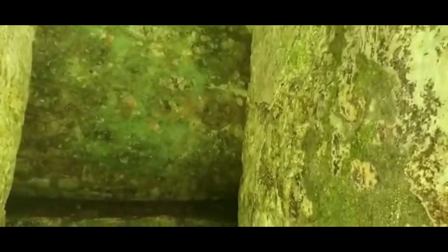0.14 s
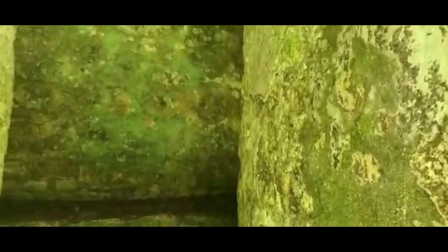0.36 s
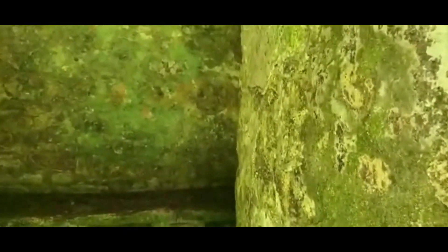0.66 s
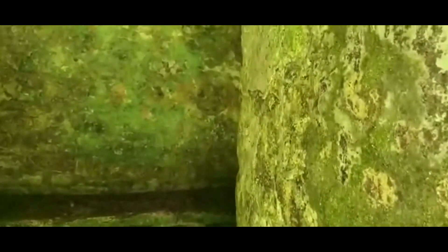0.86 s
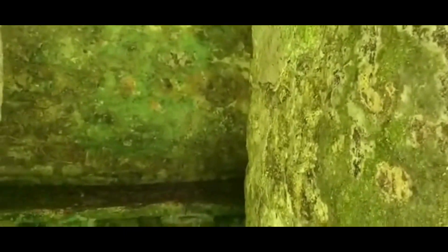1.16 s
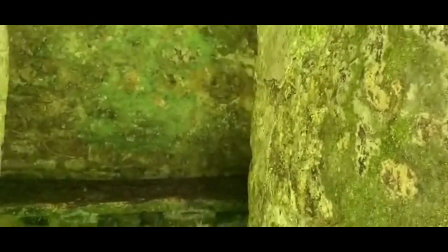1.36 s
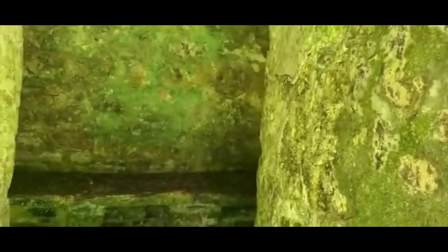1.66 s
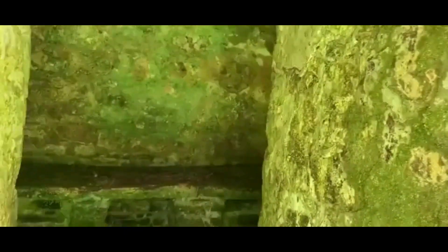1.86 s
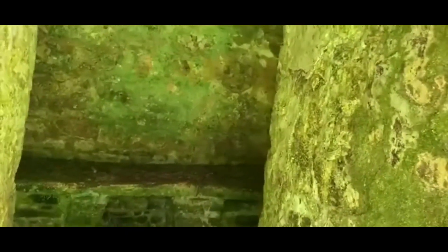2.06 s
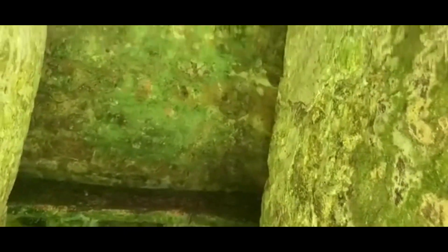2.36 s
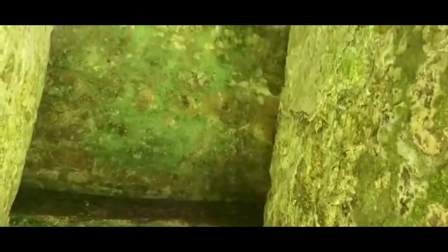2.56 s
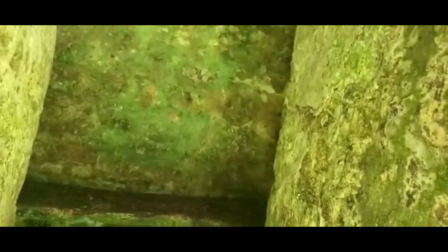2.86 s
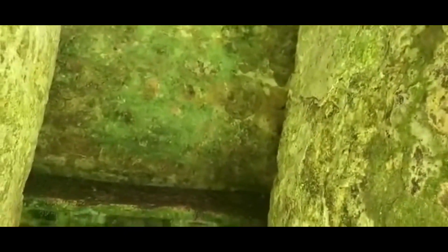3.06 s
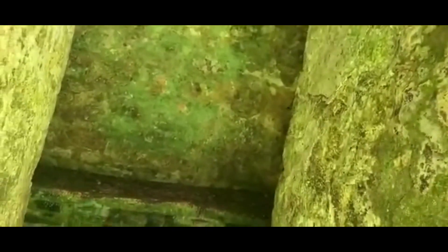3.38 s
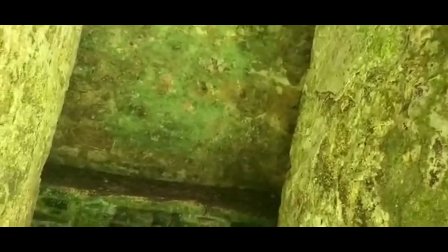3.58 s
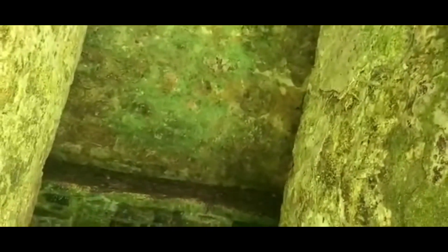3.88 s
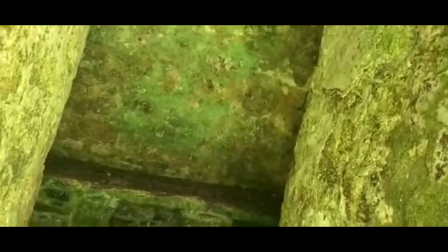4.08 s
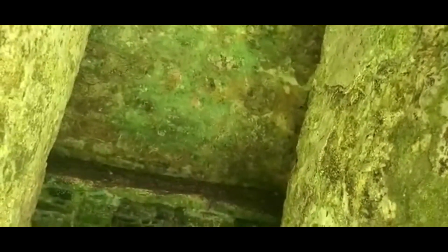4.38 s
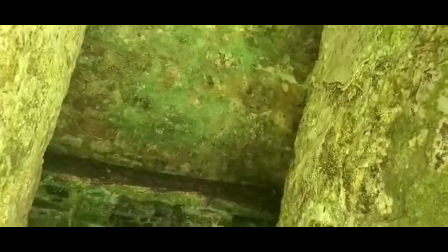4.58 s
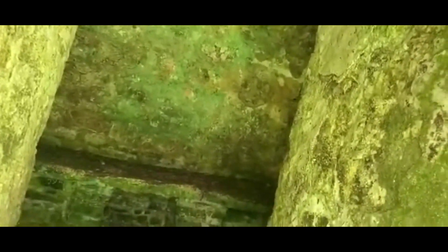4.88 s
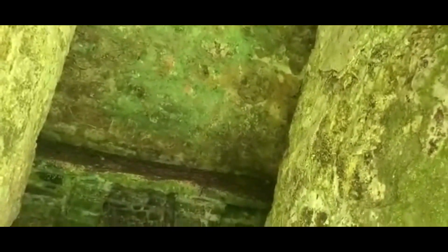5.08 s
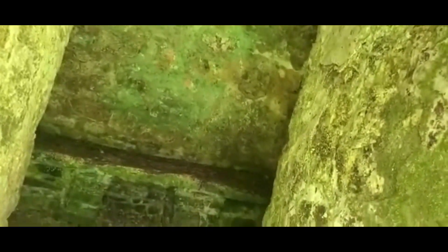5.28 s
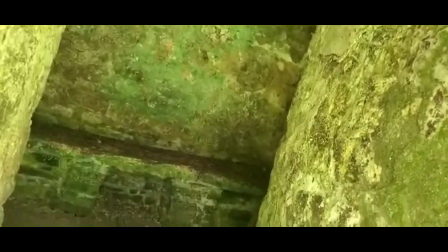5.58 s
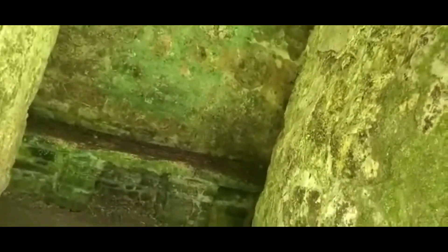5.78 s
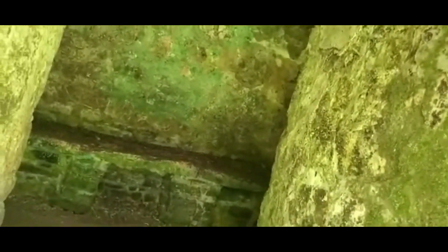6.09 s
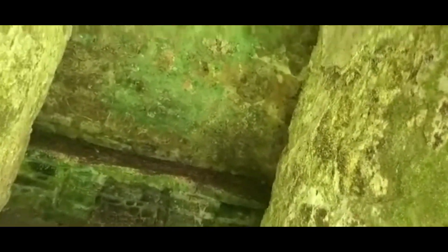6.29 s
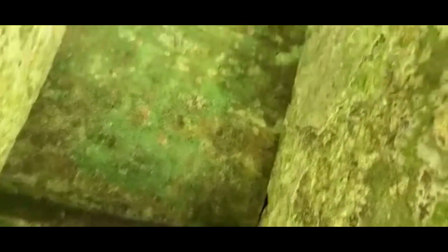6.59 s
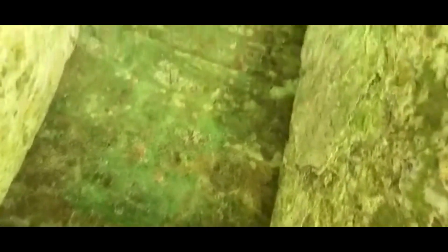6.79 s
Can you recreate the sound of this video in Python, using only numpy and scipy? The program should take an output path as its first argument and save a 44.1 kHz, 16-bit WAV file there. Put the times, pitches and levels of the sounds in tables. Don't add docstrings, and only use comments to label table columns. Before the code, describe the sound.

Handheld stereo microphone among mossy stones in a forest. Faint, bright insect throbbing and a thin steady hum continue throughout. An early handle thud and small metallic clink give way to light cloth rubbing, quick falling bird chirps, brief bright wing flicks and high arched whistles. Low shaking rumbles around five seconds, then abrupt close knocks, plastic ticks and sliding fingers dominate the final half second, heavier on the right.

```python
import sys
import numpy as np
from scipy import signal
from scipy.fft import rfft, irfft, next_fast_len
from scipy.io import wavfile
from scipy.ndimage import uniform_filter1d

SR = 44100
rng = np.random.default_rng(int(sys.argv[2]) if len(sys.argv) > 2 else 0)


def gain_from_decibels(decibels):
    exponent = np.asarray(decibels, float) / 20
    return 10 ** exponent


def store_wav(level_fs):
    pcm = np.round(np.clip(np.atleast_2d(level_fs), -1, 1) * 32767)
    wavfile.write(sys.argv[1], SR, pcm.T.astype(np.int16))


N = 306098
SIZE = next_fast_len(N + SR)
HZ = np.arange(SIZE // 2 + 1) * SR / SIZE + 1e-3
TIME = np.arange(N) / SR
CANOPY_T60_S = 1.8


def rms_one(x):
    return x / np.sqrt(np.mean(x ** 2) + 1e-20)


def in_time(rows):
    s, *columns = np.transpose(rows)
    return [np.interp(TIME, s, c) for c in columns]


def at_hz(points):
    hz, value = np.transpose(points)
    return np.interp(np.log(HZ), np.log(np.maximum(hz, 1)), value)


def sides(pan_db):
    return gain_from_decibels(np.array([pan_db / 2, -pan_db / 2]))


def drift(rate_hz):
    r = np.exp(-2 * np.pi * rate_hz * 40 / SR)
    slow = signal.lfilter([1], [1, -2 * r, r * r], rng.standard_normal(N // 40 + 2002))[2000:]
    return np.interp(np.arange(N) / 40, np.arange(len(slow)), rms_one(slow))


# pitch in Hz, likeness from 0 to 1.
LIKENESS = [(60, 0.17), (240, 0.94), (950, 0.28), (3770, 0.012), (15000, 0.11)]
# pitch in Hz, left over right in dB.
LEAN = [(60, 21), (110, 2), (200, -1.5), (380, -1), (700, -0.5), (1290, 10), (2380, -4), (4400, 2.5),
        (8120, -9), (15000, -3.5)]


def stereo_noise():
    mid, side = rfft(rng.standard_normal((2, SIZE)))
    alike = np.clip(at_hz(LIKENESS), 0, .99)
    both = np.sqrt(1 + alike) * mid + np.sqrt(1 - alike) * side * [[1], [-1]]
    return both * sides(at_hz(LEAN))


def coloured(spectrum, colour):
    inside = (HZ > colour[0][0]) & (HZ < colour[-1][0])
    x = irfft(spectrum * gain_from_decibels(at_hz(colour)) * inside, SIZE)[..., :N]
    middle = np.mean(np.atleast_2d(x), axis=0)
    return x / np.sqrt(np.mean(middle ** 2))


def canopy(x, wet_db, t60_s):
    t = np.arange(SR) / SR
    tail = rng.standard_normal((2, SR)) * gain_from_decibels(-60 * t / t60_s) * np.minimum(t / 0.02, 1)
    tail = tail / np.sqrt(np.sum(tail ** 2, axis=1, keepdims=True))
    return x + gain_from_decibels(wet_db) * irfft(rfft(x, SIZE) * rfft(tail, SIZE), SIZE)[:, :N]


def puffs(table, low_hz, high_hz):
    band = signal.butter(3, [low_hz, high_hz], "band", fs=SR, output="sos")
    noise = signal.sosfilt(band, rng.standard_normal((2, N)))
    shape = np.zeros((2, N))
    for s, db, long_s, pan_db in table:
        at = int(s * SR)
        fading = np.linspace(1, 0, int(1.6 * long_s * SR))[:N - at]
        shape[:, at:at + len(fading)] += np.outer(sides(pan_db), gain_from_decibels(db + 4.0) * fading)
    return noise * uniform_filter1d(shape, size=120, axis=1)


# pitch in Hz, level in dB per Hz.
CHORUS = [(3530, -111), (6000, -69), (6370, -15), (6930, -6), (7490, -8.5), (8080, -11.5), (9420, -12),
          (11100, -0.5), (11700, 2.5), (13900, -9), (15300, -10.5), (15800, -7), (16600, -7.5)]
# time in seconds, throbs counted so far.
PACE = [(0.075, 0), (0.715, 5), (1.197, 9), (2.245, 17), (3.38, 26), (4.48, 35), (5.505, 44), (6.08, 49),
        (6.94, 56)]
# time in seconds, level in dB.
SWELL = [(0.0, -57.5), (0.5, -61.5), (0.95, -62), (1.2, -63), (1.8, -62.5), (2.1, -60.5), (2.35, -63),
         (2.5, -60.5), (2.7, -63.5), (3.2, -64), (3.6, -61.5), (3.8, -63.5), (4.25, -63), (4.9, -63.5),
         (5.3, -63), (5.95, -64), (6.1, -63.5), (6.5, -61), (6.94, -62.5)]
TYMBAL_PER_S, THROB_S = 260, .165
TROUGH_DB, THROB_SPREAD_DB = -5.0, .5


def cicadas():
    gaps_s = (1 + .12 * rng.standard_normal(2000)) / TYMBAL_PER_S
    at = (np.cumsum(gaps_s) * SR).astype(int)
    clicks = np.zeros(N)
    clicks[at[at < N]] = gain_from_decibels(1.9 * rng.standard_normal(2000))[at < N]
    bursts = signal.lfilter([1], [1, -np.exp(-1 / (0.000083 * SR))], clicks)

    s, count = np.transpose(PACE)
    crests_s = np.interp(np.arange(count[-1] + 1), count, s)
    crest_db = np.interp(crests_s, *np.transpose(SWELL))
    crest_db = crest_db + THROB_SPREAD_DB * rng.standard_normal(len(crests_s))
    power = np.full(N, gain_from_decibels(2 * (np.median(crest_db) + TROUGH_DB)))
    trough = power.copy()
    for s, db in zip(crests_s, crest_db):
        span = slice(max(int((s - THROB_S) * SR), 0), min(int((s + THROB_S) * SR), N))
        x = (TIME[span] - s) / THROB_S
        x = np.where(x < 0, x * 1.4, x)
        power[span] += gain_from_decibels(2 * db) * np.cos(np.pi * np.clip(x, -.5, .5)) ** 2

    near = .2 * np.sqrt(power - trough) * rms_one(bursts)
    white = irfft(stereo_noise(), SIZE)[:, :N] * (np.sqrt(power) + near)
    return gain_from_decibels(-1.0) * np.sqrt(np.mean(power)) * coloured(rfft(white, SIZE), CHORUS)


# start in seconds, peak in dB, length in seconds, left over right in dB.
FLICKS = [
    (1.974, -52, 0.012, 5),
    (2.423, -52.5, 0.061, -4),
    (3.535, -49, 0.015, 0),
]


def wing_flicks():
    return puffs(FLICKS, 10900, 15300)


# time in seconds, level in dB.
HUM = [(0.0, -80), (0.1, -72), (0.5, -74), (1.1, -76.5), (1.5, -87), (1.7, -76.5), (2.1, -72.5), (3.1, -73),
       (3.6, -72), (5.0, -76), (5.5, -71.5), (6.3, -75.5), (6.55, -71.5), (6.94, -73)]
# pitch in Hz, width in Hz, level in dB.
HUM_MODES = [(2195, 39, -7.5), (2296, 180, -16), (2000, 77, -14.5)]
# time in seconds, pitch in Hz, level against the blur in dB.
SOLOIST = [(0, 2216, -4), (3.4, 2204, -8.5), (4.6, 2201, 1), (6.94, 2194, 0.5)]
HUM_WANDER_HZ, HUM_BEAD_DB, HUM_BLUR_DB = 3, 3.5, -2.0


def cricket():
    shape = 0
    for hz, width_hz, db in HUM_MODES:
        shape = shape + gain_from_decibels(db) / (1 + ((HZ - hz) / (width_hz / 2)) ** 2) / np.sqrt(width_hz)
    blur = irfft(stereo_noise() * shape, SIZE)[:, :N]
    blur = gain_from_decibels(HUM_BLUR_DB) * blur / np.std(blur.mean(axis=0))
    solo_hz, solo_db = in_time(SOLOIST)
    turns = np.cumsum(solo_hz + HUM_WANDER_HZ * drift(3.83)) / SR
    line = []
    for _ in range(2):
        beads = gain_from_decibels(HUM_BEAD_DB * drift(30))
        line.append(rms_one(beads * np.sin(2 * np.pi * turns + 0.62 * drift(1.3))))
    return gain_from_decibels(in_time(HUM)[0]) * (gain_from_decibels(solo_db) * sides(-7.0)[:, None] * line + blur)


# start in seconds, first, middle and last pitch in Hz, level in dB.
WHISTLES = [
    (2.65, 6470, 6740, 6530, -66),
    (4.538, 6707, 7044, 6866, -60.5),
    (5.586, 7100, 7460, 7100, -65),
    (6.44, 7230, 7570, 7040, -65),
]
WHISTLE_WARBLE_HZ = [45, 80, 210, 230]
WHISTLE_PACE = [.85, 0.94, 0.99, .92]
WHISTLE_S, ATTACK_S, RELEASE_S = .38, 0.041, 0.046
SAG_DB, LAST_PUSH_DB, WHISTLE_EDGE_DB = -4, 2.5, -22


def whistles():
    out = np.zeros(N)
    effort_s = [0, ATTACK_S, WHISTLE_S / 2, WHISTLE_S - RELEASE_S, WHISTLE_S]
    effort_levels_db = [WHISTLE_EDGE_DB, 0, SAG_DB, LAST_PUSH_DB, WHISTLE_EDGE_DB]
    for call, warble_hz, pace in zip(WHISTLES, WHISTLE_WARBLE_HZ, WHISTLE_PACE):
        s, first_hz, middle_hz, last_hz, db = call
        since = (TIME - s) / pace
        x = np.clip(since / WHISTLE_S, 0, 1)
        arch_hz = (middle_hz - (first_hz + last_hz) / 2) * np.sin(np.pi * x) ** 1.5
        hz = first_hz + (last_hz - first_hz) * x + arch_hz
        effort_db = np.interp(since, effort_s, effort_levels_db)
        gate = np.interp(since, [0, 0.0092, WHISTLE_S - .02, WHISTLE_S], [0, 1, 1, 0])
        tone = np.sin(2 * np.pi * np.cumsum(hz + warble_hz * drift(201.5)) / SR)
        out += gate * gain_from_decibels(db + effort_db + 2.5 * drift(43)) * tone
    return canopy(np.outer(sides(-5.0), out), wet_db=1.5, t60_s=.4 * CANOPY_T60_S)


# start in seconds, level in dB, first and last pitch in Hz, length in seconds.
CHIRPS = [(0.58, -73, 3460, 3420, 0.32), (1.262, -62.5, 4500, 4200, 0.088), (1.33, -66, 4200, 3830, 0.066),
          (1.39, -68, 3780, 3400, 0.073), (2.072, -59.5, 5270, 4710, 0.033),
          (2.112, -61.5, 5970, 4700, 0.05), (2.14, -59, 4200, 3530, 0.066), (2.155, -63, 3900, 3250, 0.084),
          (2.196, -63.5, 4400, 3265, 0.14), (2.26, -67, 4520, 3940, 0.16), (3.368, -69, 2410, 3280, 0.023),
          (3.57, -64.5, 4910, 4470, 0.064), (3.63, -66.5, 4570, 4130, .1), (3.952, -66, 2470, 2300, 0.073),
          (.62, -70.5, 1286, 1110, 0.18), (5.89, -73, 5250, 4800, .05), (5.885, -63.5, 4650, 4270, 0.083),
          (5.93, -70, 4580, 4230, 0.13), (5.95, -72, 4100, 3550, 0.11)]
# start in seconds, level in dB, first and last pitch in Hz, length in seconds.
COOS = [(5.84, -70.5, 680.5, 665, 0.084), (2.100, -68, 1800, 1760, 0.043), (2.243, -55, 4750, 5100, 0.03),
        (2.448, -88, 7100, 7100, 0.07), (5.237, -66.5, 2360, 2290, 0.064), (5.35, -75, 2350, 2295, .08),
        (5.59, -71, 1740, 1687, 0.092), (5.7, -73.5, 1690, 1670, 0.15), (5.92, -76.5, 1680, 1670, 0.081),
        (4.125, -66.5, 1960, 1840, .11), (4.25, -76, 1820, 1754, 0.12), (6.53, -67.5, 1845, 1850, 0.065),
        (6.64, -70, 1845, 1855, 0.12), (1.302, -70, 696, 700, 0.05), (1.643, -81, 704, 680, 0.12),
        (4.47, -77.5, 675, 670, 0.051)]
# start in
# seconds, level in dB, first and last pitch in Hz, length in seconds.
PIPES = [(2.27, -72, 5085, 5080, 0.14), (0.3, -85.5, 378.3, 372, 2.07), (3.5, -74, 4160, 4140, 0.3),
         (3.9, -78.5, 4150, 4150, 0.13), (4.05, -78.5, 4150, 4145, 0.23), (4.42, -89, 4130, 4150, 0.38),
         (4.6, -80, 1580, 1575, 0.2), (5.05, -80, 4105, 4095, 0.13), (5.36, -79.5, 4060, 4060, 0.14),
         (5.17, -65, 1900, 2085, 0.1), (3.7, -78, 2050, 2050, .4), (6.1, -84, 1600, 2600, .45),
         (3.55, -77, 2300, 2060, .3), (5.85, -80, 1965, 1960, .25), (5.82, -75.5, 4120, 4065, 0.45),
         (6.36, -77, 4100, 4600, 0.18), (6.76, -82, 4050, 4070, .1)]
CHIRP_WARBLE, COO_WARBLE, PIPE_WARBLE = .034, .012, .002


def birds():
    out, warble = np.zeros(N), drift(320)
    for notes, share in (CHIRPS, CHIRP_WARBLE), (COOS, COO_WARBLE), (PIPES, PIPE_WARBLE):
        for s, db, first_hz, last_hz, long_s in notes:
            x = np.arange(int(long_s * SR)) / (long_s * SR)
            span = slice(int(s * SR), int(s * SR) + len(x))
            hz = (first_hz + (last_hz - first_hz) * x) * (1 + share * warble[span])
            tone = np.sin(2 * np.pi * np.cumsum(hz) / SR)
            out[span] += gain_from_decibels(db) * np.sqrt(np.sin(np.pi * x)) * tone
    return gain_from_decibels(-6.0) * canopy(np.outer(sides(-6.0), out), wet_db=6.5, t60_s=0.57 * CANOPY_T60_S)


# start in seconds, swing in the right port in dB, first and last pitch in Hz, fade in seconds.
KNOCKS = [(0.036, -35.5, 60.3, 47, 0.044), (0.135, -20, 117, 52, 0.021), (.296, -37.5, 63, 49, 0.033),
          (.59, -49.5, 69, 55, 0.022), (1.77, -53, 70, 55, 0.035), (0.875, -42, 102, 75.4, 0.016),
          (2.666, -47.5, 102, 70, 0.024), (3.502, -51.5, 77.6, 50.3, 0.022), (4.842, -48, 97, 70, 0.016),
          (6.3905, -14, 114, 39, 0.028), (6.4405, -28, 70, 60, 0.0067), (6.457, -29, 92, 67, 0.029),
          (6.77, -30.5, 85.5, 74.6, 0.018), (6.7917, -14, 116, 54.5, 0.021), (6.838, -36.5, 55, 48, 0.017),
          (6.8702, -23, 105, 76.5, 0.022)]
SETTLE_S = 0.023
KNOCK_LEFT_DB, KNOCK_LEFT_LINGERS = -24, 1.24


def swing(t, fade_s):
    return (t / fade_s * np.exp(1 - t / fade_s)) ** 1.23 * np.exp(-(t / (1.34 * fade_s)) ** 2)


def knocks():
    out, t = np.zeros((2, N + SR)), np.arange(SR // 5) / SR
    for s, db, first_hz, last_hz, fade_s in KNOCKS:
        turns = last_hz * t + (first_hz - last_hz) * SETTLE_S * (1 - np.exp(-t / SETTLE_S))
        left, right = swing(t, KNOCK_LEFT_LINGERS * fade_s), swing(t, fade_s)
        at = int(s * SR)
        out[1, at:at + len(t)] += gain_from_decibels(db) * right * np.sin(2 * np.pi * turns)
        out[0, at:at + len(t)] += gain_from_decibels(db + KNOCK_LEFT_DB) * left * np.sin(2 * np.pi * turns - 1.2)
    leak = signal.butter(2, 28, "high", fs=SR, output="sos")
    return signal.sosfilt(leak, out[:, :N])


# start in seconds, peak in dB, pitch in Hz, left over right in dB.
TICKS = [(.017, -43, 3700, 4), (.087, -51.5, 630, -1), (.0873, -56, 1000, -1), (.088, -50, 234, -11),
         (0.141, -46, 215, -9), (.788, -47.5, 4480, -20), (1.355, -63, 593, 16), (3.074, -54, 805, -3),
         (3.074, -67, 332, 7), (3.241, -66.5, 228, -1), (3.276, -58, 534, -5), (3.601, -62.5, 610, -16),
         (6.3866, -46, 800, -14), (6.3944, -28.5, 1880, -18), (6.3942, -33.5, 1150, -12),
         (6.3948, -32, 280, -13), (6.3948, -40.5, 780, 14), (6.4, -35, 143, -9), (6.4073, -36, 890, 5),
         (6.4021, -50, 300, 16), (6.4069, -43, 1900, 12), (6.4305, -55, 1200, -15), (6.407, -41, 2140, -23),
         (6.4083, -40.5, 334, -15), (6.535, -57, 2000, -22), (6.7944, -35, 1650, -21),
         (6.7947, -34.5, 1010, -19), (6.7943, -43.5, 605, 21), (6.7944, -27.5, 252, -18.5),
         (6.8733, -40.5, 230, -16)]


def ticks():
    out, t = np.zeros((2, N)), np.arange(SR // 30) / SR
    for s, db, hz, pan_db in TICKS:
        cycles, at = t * hz, int(s * SR)
        if hz < 400:
            shape = -1.5 * np.exp(-((cycles - .75) / 0.65) ** 2)
        else:
            shape = 1.8 * np.minimum(cycles / 0.49, 1) * np.exp(-cycles / 1.21)
        ring = gain_from_decibels(db) * shape * np.sin(2 * np.pi * cycles)
        out[:, at:at + len(t)] += np.outer(sides(pan_db), ring)
    out[0] = np.roll(out[0], round(0.00026 * SR))
    soft = signal.butter(4, 3800, fs=SR, output="sos")
    return signal.sosfilt(soft, out)


# centre in seconds, peak in dB, width in seconds, left over right in dB, outward 1 or inward -1.
SHOVES = [(.138, -40, 0.0021, -20, -1), (6.4105, -42, 0.0012, 22, -1), (6.8062, -41, 0.0013, 20, 1),
          (6.8105, -48, .002, 20, -1), (6.389, -52, 0.00067, 16, -1), (6.391, -48, .0007, 16, -1),
          (6.3947, -31, 0.0021, -20, 1), (6.3995, -37, 0.00048, 18, -1), (6.8, -34, 0.0022, -22, 1),
          (6.799, -36, 0.00061, 20, -1), (6.878, -53, 0.00098, 18, -1), (6.4135, -50, .0008, 20, -1),
          (6.4165, -56, 0.00054, 20, -1), (6.798, -37, 0.0011, -20, 1), (6.398, -34, .001, -20, 1),
          (6.889, -32, 0.0021, -16, -1)]


def shoves():
    out, t = np.zeros((2, N)), np.arange(-600, 600) / SR
    for s, db, width_s, pan_db, way in SHOVES:
        at = int(s * SR) - 600
        bump = np.sign(way) * gain_from_decibels(db) * np.exp(-(t / width_s) ** 2)
        out[:, at:at + len(t)] += np.outer(sides(pan_db), bump)
    leak = signal.butter(1, 45, "high", fs=SR, output="sos")
    return signal.sosfilt(leak, out)


# start in seconds, peak in dB, length in seconds, left over right in dB.
SCUFFS = [
    (6.34, -61, 0.014, 1),
    (6.398, -41, 0.015, -9),
    (6.428, -53, 0.0068, -8),
    (6.44, -48, 0.017, -7),
    (6.46, -62.5, 0.19, 3),
    (6.8, -55, 0.068, 0),
    (6.868, -58.5, 0.095, -5),
]


def scuffs():
    return puffs(SCUFFS, 400, 1900)


# start in seconds, peak in dB, length in seconds, left over right in dB.
SPLASHES = [(3.22, -66, 0.07, -7), (3.37, -67, .03, -4), (3.53, -72, .006, 0), (6.386, -52, 0.0082, -6),
            (6.397, -61, 0.023, 0), (6.42, -61, 0.077, 0), (6.44, -69, 0.011, -1), (6.533, -67, .004, -1),
            (6.78, -63, .03, -2), (6.81, -65.5, .05, 5), (6.872, -64.5, .04, -3)]


def splashes():
    return puffs(SPLASHES, 2400, 5000)


# start in seconds, peak in dB, length in seconds, left over right in dB.
SNAPS = [
    (6.3948, -50, .001, 2.3),
    (6.407, -52, .001, 10),
]


def snaps():
    return puffs(SNAPS, 2500, 9000)


# start in seconds, level in dB.
CLINKS = [
    (0.5376, -52),
    (.5398, -47.5),
]
# pitch in Hz, level in dB, t60 in seconds.
BUCKLE = [(1377, -7, 0.022), (1800, -2.5, .008), (2300, -3, 0.0073), (3250, -2.5, 0.011)]


def clinks():
    out, t = np.zeros(N), np.arange(SR // 20) / SR
    ring = sum(-gain_from_decibels(db - 60 * t / t60_s) * np.sin(2 * np.pi * hz * t) for hz, db, t60_s in BUCKLE)
    for s, db in CLINKS:
        at = int(s * SR)
        out[at:at + len(t)] += gain_from_decibels(db) * ring * np.minimum(t / 0.00015, 1)
    band = signal.butter(4, [1050, 3900], "band", fs=SR, output="sos")
    return np.outer(sides(-8.0), signal.sosfilt(band, out))


STROKE_EDGE_DB = -16.5


def strokes(table, rest_db):
    t = TIME[::64]
    power = gain_from_decibels(2 * rest_db)
    for s, db, swell_s, fade_s in table:
        away = np.maximum((s - t) / swell_s, (t - s) / fade_s)
        power = power + gain_from_decibels(2 * (db + STROKE_EDGE_DB * away))
    return np.interp(TIME, t, np.sqrt(power))


# crest in seconds, level in dB, swell in seconds, fade in seconds.
RUBS = [(0.09, -68.5, 0.014, 0.07), (0.7, -71.5, 0.49, 0.66), (1.37, -70, 0.045, .2),
        (1.72, -76.5, 0.3, 0.12), (2.07, -74.5, 0.16, 0.56), (2.37, -74.5, 0.07, 0.35),
        (2.8, -77.5, .4, 0.55), (3.09, -69.5, 0.15, 0.15), (3.29, -69.5, 0.12, 0.24),
        (3.61, -71, 0.099, 0.23), (4.0, -75.5, 0.37, 0.68), (4.46, -75.5, 0.084, 0.17),
        (4.95, -81, 0.16, 0.44), (5.7, -80, 1, 0.078), (5.91, -72.5, 0.19, 0.079)]
# crest in seconds, level in dB, swell in seconds, fade in seconds.
HISSES = [(0.07, -86, 0.35, 0.47), (0.67, -82, 0.07, 0.37), (0.93, -78.5, 0.73, 0.16),
          (1.45, -89, 0.12, 0.13), (2.0, -83.5, 0.095, 0.18), (2.35, -76.5, 0.21, 0.28),
          (2.62, -86, 0.3, 0.4), (2.9, -87, 0.22, 0.32), (3.24, -81, 0.18, 0.16),
          (3.39, -81.5, 0.079, 0.053), (3.68, -83.5, 0.41, 0.65)]
# pitch in Hz, level in dB per Hz.
RUB = [(150, -1.5), (260, -1.5), (500, 3), (1000, 1.5), (1800, -12.5), (2800, 0)]
# pitch in Hz, level in dB per Hz.
HISS = [(700, -8), (1150, 2.5), (1600, 6), (2500, 4), (3500, 6), (4400, 2), (5600, -6), (7000, 3.5),
        (9000, -12)]


def rustle():
    dull = strokes(RUBS, rest_db=-89) * coloured(stereo_noise(), RUB)
    dry = gain_from_decibels(12.0) * strokes(HISSES, rest_db=-96.5) * coloured(stereo_noise(), HISS)
    return gain_from_decibels(2.0 * drift(100)) * dull + gain_from_decibels(1.46 * drift(79)) * dry


# time in seconds, level in dB, left over right in dB.
RUMBLE = [(0.0, -73.5, -30), (0.21, -63.5, -7), (0.36, -71.5, -19), (0.6, -75.5, -8), (0.9, -79.5, -22),
          (1.3, -77.5, 4), (1.85, -78, -11), (2.1, -74, -7.5), (2.5, -77, -10), (2.7, -76.5, -10),
          (3.2, -83.5, -4), (3.48, -74, -6), (4.6, -81.5, -9.5), (4.97, -65, -4), (5.55, -63.5, 2.5),
          (5.8, -80.5, -16.5), (6.25, -81, -13), (6.53, -66.5, -16)]
# pitch in Hz, level in dB per Hz.
RUMBLE_COLOUR = [(13, 3.5), (22, -47), (48, 2.5), (80, -1), (96, -0.5), (119, -12.5), (284, -20.5),
                 (350, -52), (460, -47), (770, -120)]


def rumble():
    level_db, pan_db = in_time(RUMBLE)
    lumps_db = 3.2 * drift(14)
    shared, own = (coloured(rfft(rng.standard_normal(SIZE)), RUMBLE_COLOUR) for _ in range(2))
    ports = np.array([0.46 * shared + 0.66 * own, shared])
    return gain_from_decibels(level_db + 1.0 + lumps_db) * sides(pan_db) * ports


# pitch in Hz, level in dB per Hz.
AIR = [(530, -68), (900, -17), (1140, -11.5), (1480, -12.5), (1530, -16), (1730, -7.5), (1950, -13.5),
       (2170, -1), (2490, -14), (2770, -21), (3510, -13.5), (4260, -14.5), (4620, -18.5), (4800, -26.5),
       (5400, -27.5), (6000, -29), (6250, -13.5), (7000, -13.5), (7800, -17.5), (8600, -41), (13900, -120)]
# pitch in Hz, level in dB per Hz.
HOLLOW = [(82, -22), (140, 0.5), (302, -7.5), (372, -4), (437, -11.5), (517, -7.5), (592, -9.5), (950, -24),
          (1240, -32), (2090, -120)]
AIR_DB, HOLLOW_DB = -74, -83.5


def air():
    forest = gain_from_decibels(AIR_DB) * coloured(stereo_noise(), AIR)
    hollow = gain_from_decibels(HOLLOW_DB) * coloured(stereo_noise(), HOLLOW)
    whole = rfft(forest + hollow, SIZE)
    octave = np.log2(HZ / 75)
    out = np.zeros((2, N))
    for k in range(8):
        part = irfft(whole * np.clip(1 - abs(octave - k), 0, 1), SIZE)[:, :N]
        out += part * gain_from_decibels(1.85 * drift(7.9))
    return out


def patchy(x, depth_db):
    cells = signal.stft(x, nperseg=1024)[2]
    field = uniform_filter1d(rng.standard_normal(cells.shape), size=3, axis=1)
    field = uniform_filter1d(field, size=5, axis=2)
    return signal.istft(cells * gain_from_decibels(depth_db * rms_one(field)), nperseg=1024)[1][:, :N]


def scene():
    far = patchy(cicadas() + air(), depth_db=2.0)
    forest = far + wing_flicks() + cricket() + whistles() + birds()
    handle = knocks() + ticks() + shoves() + clinks() + rustle() + rumble()
    fingers = scuffs() + splashes() + snaps()
    return forest + handle + fingers


# start in seconds, end in seconds, upper edge in Hz.
DULL_SPELLS = [
    (1.99, 2.066, 14400),
    (2.445, 2.475, 15400),
    (3.546, 3.602, 14200),
]


def dull_after_flicks(x):
    out = x.copy()
    for start_s, end_s, edge_hz in DULL_SPELLS:
        a, b = int(start_s * SR), int(end_s * SR)
        span = slice(a - 500, b + 500)
        steep = signal.cheby2(20, 50, edge_hz + 300, fs=SR, output="sos")
        kept = signal.sosfiltfilt(steep, x[:, span])
        i = np.arange(b - a + 1000)
        fade = np.clip(np.minimum(i - 400, b - a + 600 - i) / 100, 0, 1)
        out[:, span] += fade * (kept - x[:, span])
    return out


def band_limit(x):
    return signal.sosfilt(signal.butter(12, 16550, fs=SR, output="sos"), x)


def record(dry):
    mix = dull_after_flicks(dry)
    return band_limit(mix)


dry = scene()
out = record(dry)
store_wav(out)
```